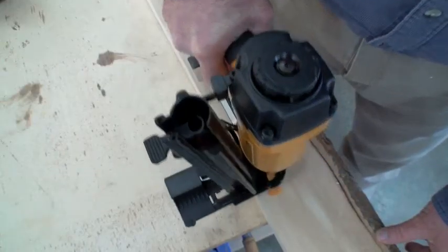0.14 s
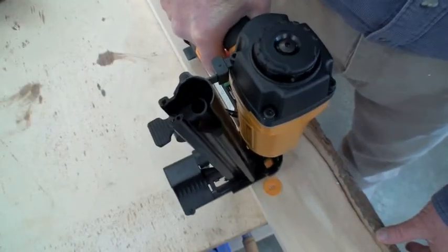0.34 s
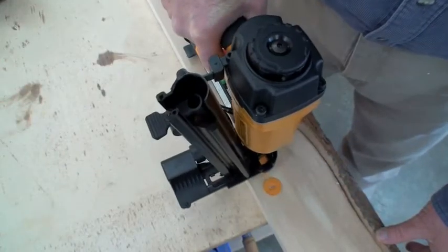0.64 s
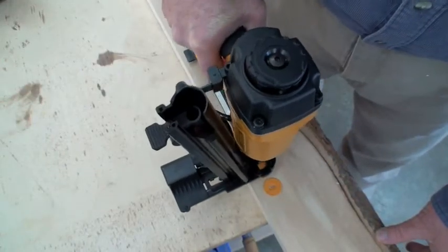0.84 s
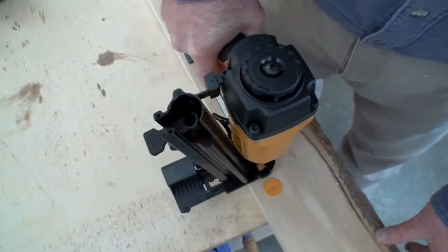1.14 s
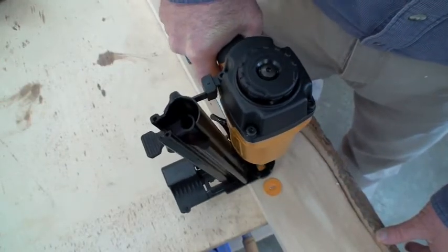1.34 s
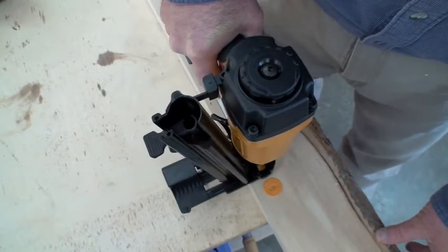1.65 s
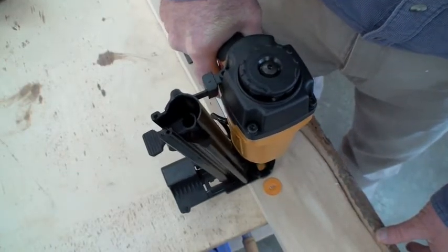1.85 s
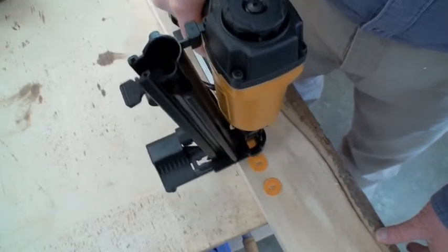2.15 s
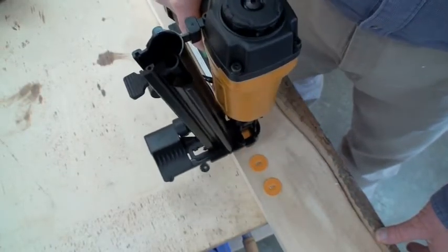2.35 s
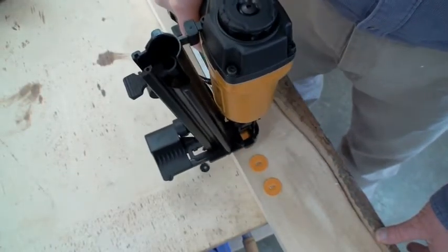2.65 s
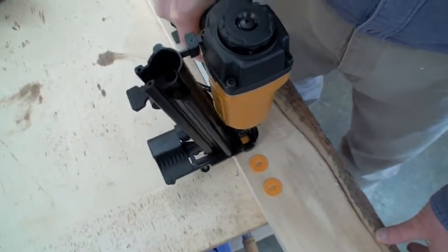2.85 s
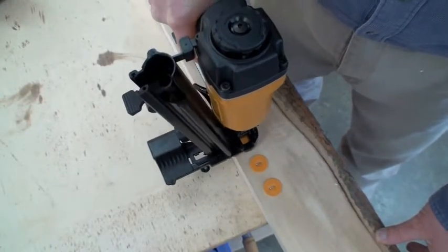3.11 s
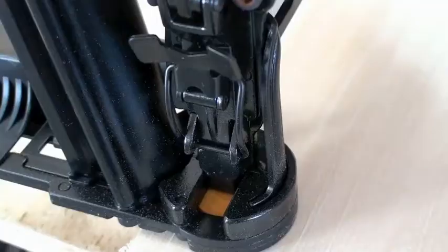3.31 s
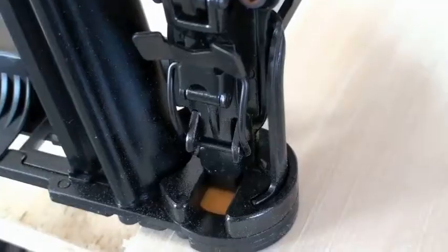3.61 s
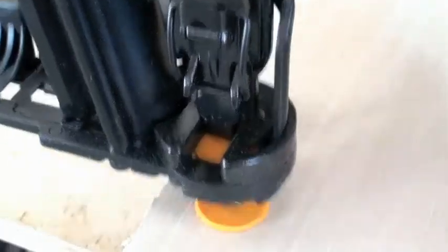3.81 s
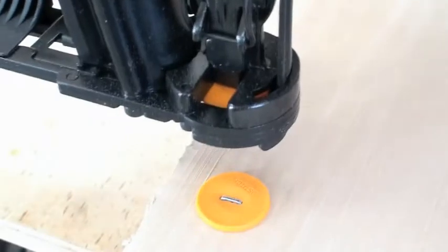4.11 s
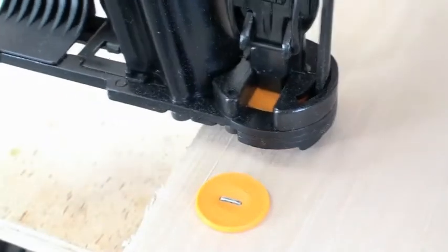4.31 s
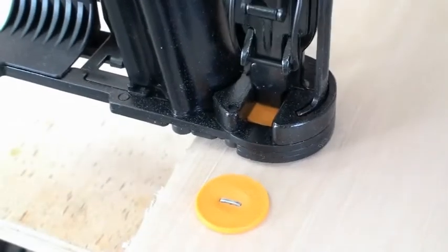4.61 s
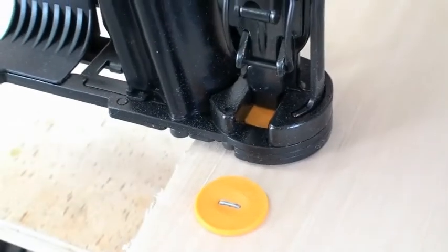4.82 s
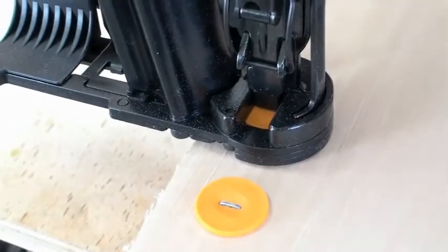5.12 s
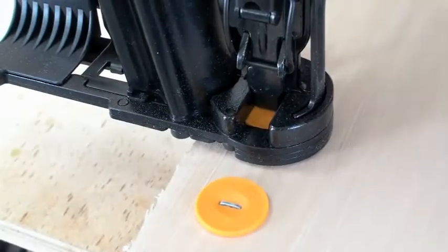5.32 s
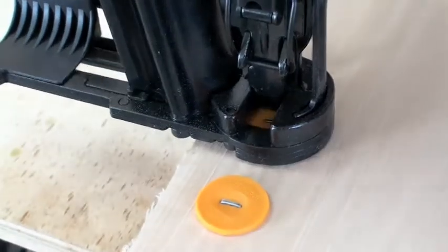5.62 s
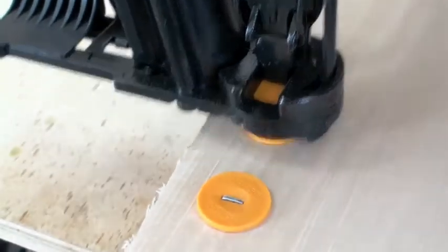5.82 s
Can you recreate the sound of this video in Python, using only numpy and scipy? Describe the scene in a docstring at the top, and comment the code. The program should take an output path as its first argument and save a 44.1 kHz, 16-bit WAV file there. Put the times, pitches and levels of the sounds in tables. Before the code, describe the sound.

The echo of a shot dies away in a workshop, with a small plastic tick, over a faint low rumble. At about 1 second a pneumatic stapler clacks and knocks down on plywood, close to the microphone, with a very faint squeak and then a softer knock. At 1.6 seconds it fires a sharp, loud shot, followed at once by a short hiss of air and a brief room echo. A light tick follows. Near 3 seconds the tool clacks and knocks on the board again. The second shot comes at 3.5 seconds with its hiss, and exhaust air buffets the microphone around 3.9 seconds. Light clicks and soft wooden knocks fall between 4.5 and 4.9 seconds. A third, slightly weaker shot fires at 5.6 seconds, followed by a short hiss and another low puff of air on the microphone.

```python
"""A shot's echo dies away in a workshop; close by, a pneumatic cap stapler is set on plywood and fired.
Each of the three shots is a spit of air, the piston's blow and recoil, then exhaust and piston return.
Between shots the safety foot clacks, the nose knocks on the board and plastic caps tick in the feed.
Twice the exhaust air buffets the microphone. A limiter flattens the shots, so the room swells behind them."""
import sys
import numpy as np
from scipy import signal
from scipy.fft import rfft, irfft, next_fast_len
from scipy.io import wavfile
from scipy.ndimage import uniform_filter1d

SR = 44100
rng = np.random.default_rng(int(sys.argv[2]) if len(sys.argv) > 2 else 0)


def to_wav(sig):
    """Store sig (one row per channel, or 1-D mono) as 16-bit WAV at the path in sys.argv[1].

    Samples outside -1..1 are clipped; the rate is SR.
    """
    pcm = np.clip(np.atleast_2d(sig), -1, 1) * 32767
    pcm = np.round(pcm).astype(np.int16)
    wavfile.write(sys.argv[1], SR, pcm.T)  # frames by channels


N = 262836
LEAD = SR // 2  # pre-roll: holds the shot whose echo opens the scene
TIME_S = np.arange(-LEAD, N) / SR
CUTOFF_HZ = 12900

# Workshop background. Each row: time in seconds, level in dB.
SHOP_LEVELS = [(0, -43), (1.5, -43.5), (2.6, -47.5), (4.3, -49), (5.3, -46.5)]
# Workshop reverberation. Each row: frequency in Hz, t60 in seconds.
ROOM_DECAY = [(60, 1), (170, 0.66), (500, 0.61), (1500, 0.71), (4000, 0.63), (7000, 0.43), (12000, 0.27)]

# Spectral shapes. Each row: frequency in Hz, relative density in dB.
SHOP_SPECTRUM = [(25, -12), (45, -8), (100, -0.5), (170, 1), (270, -2.5), (500, -9.5), (800, -12.5),
                 (1200, -17), (2700, -23.5), (6000, -26.5), (12500, -28)]  # background rumble
TICK_SPECTRUM = [(300, 13), (2000, 6), (4000, -0.5), (7000, -5), (10000, -1), (12500, -5.5)]  # caps, first touch, trigger friction
THUD_SPECTRUM = [(50, -27.5), (140, 7), (300, 3), (600, 3.5), (1400, -4), (2400, -7), (4000, -34),
                 (12000, -59.5)]  # nose on board
SPIT_SPECTRUM = [(40, 9.5), (150, -26.5), (400, 3), (1000, -22.5), (3000, -11.5), (6000, -8), (10000, -6),
                 (12500, -4.5)]  # air at firing
EXHAUST_SPECTRUM = [(40, 3), (100, 0), (400, -4), (1500, -8), (2800, -7), (4500, -3), (9000, 0), (12500, 1)]  # air at release
BOOM_SPECTRUM = [(40, -40), (100, -10.5), (160, -1), (260, -2), (430, 0.5), (620, -2), (820, 3.8),
                 (1020, 0), (1350, -1), (1950, 0), (2600, -6.5), (4000, -9), (7000, -15), (12500, -13)]  # board under a piston blow
CRACK_SPECTRUM = [(30, -8), (70, -12), (160, 5), (350, 2.5), (700, -8), (1400, -8.5), (2100, -0.5),
                  (3000, -7), (4300, -9.5), (7000, -8.5), (12500, -9.5)]  # piston impact

# Resonances. Each row: frequency in Hz, gain in dB, t60 in seconds.
PLYWOOD_MODES = [(84.2, -14, 0.077), (130, -23.5, 0.29), (163.7, -11, 0.15), (253.7, -5.5, 0.27),
                 (358, -5, 0.18), (411.3, 1, 0.19), (436.5, -0.5, 0.061), (575, -15, 0.23),
                 (808, -16.5, 0.45), (1050, -6.5, .09), (1230, -4, .08), (1550, -3, 0.13),
                 (1830, -4, 0.093), (2200, -30, 0.059)]
BODY_MODES = [(832.5, -15, 0.36), (1010, -8, .02), (1212, 0, 0.042), (1330.5, -5.5, 0.12),
              (1440, -2, 0.044), (1690, -4.5, 0.012), (1840, -6, 0.019), (2180, -25, 0.1)]  # the tool's steel
FOOT_SPRING_MODES = [(403, 0, .17), (432, -3, .12)]  # a close pair that swells together

# Exhaust air at the microphone. Each row: start and end in seconds, level in dB, eddy rate in Hz.
EXHAUST_GUSTS = [(3.805, 3.975, -7, 72), (5.893, 5.97, -5.5, 86)]
# Safety foot. Each row: start in seconds, clack in dB, spring ring in dB.
FOOT_CLACKS = [(.976, -10.5, -19), (2.92, -14, -20), (4.497, -26.5, -35), (4.674, -31, -27),
               (4.74, -28.5, -50), (4.891, -30.5, -46)]
# Plastic caps clicking in the feed. Each row: start in seconds, level in dB.
FEED_TICKS = [(0.176, -15), (2.069, -20), (2.931, -31), (4.505, -35), (4.741, -30)]
# Nose set on the board. Each row: start in seconds, level in dB, contact in seconds, touch tick in dB.
NOSE_LANDINGS = [(1.037, -6.5, .0011, -20), (1.430, -14, .0052, -46), (2.975, -5, .00085, -22),
                 (4.535, -31, .0033, -55), (4.748, -12, .0037, -45), (4.893, -18, .0036, -55)]
# Shots. Each row: firing time in seconds, strength in dB, trigger release time in seconds,
# then exhaust, piston return and trigger rub gains in dB.
STAPLE_SHOTS = [(-.25, 0, -.1, 2.5, 7, 0), (1.612, 1.5, 1.762, 3, 7, -1), (3.488, 2, 3.677, 4, 4, 5),
                (5.576, -5, 5.741, -6, -6, -10)]
# Piston blows. Each row: delay in seconds, then crack, steel body and room impulse in dB.
PISTON_DRIVE = [(.003, 5.5, 4, 38.5), (.0238, 13.5, 11, 26)]  # drive and recoil, timed from firing
PISTON_RETURN = [(-.019, -7, -8, 13), (.03, 2, 7, 17)]  # unseating and landing, timed from release


def from_db(db):
    """Decibels to gain."""
    return 10 ** (np.asarray(db) / 20)


def unit_rms(x):
    """Scale to rms 1."""
    return x / np.sqrt(np.mean(x ** 2) + 1e-20)


def at_hz(points, hz):
    """Read a table along a log-frequency axis."""
    points_hz, values = np.transpose(points)
    return np.interp(np.log(np.maximum(hz, 1)), np.log(points_hz), values)


def coloured(x, spectrum):
    """Shape the spectrum, with soft outer edges; a white input keeps its power."""
    size = next_fast_len(len(x))
    hz = np.fft.rfftfreq(size, 1 / SR)
    edges = hz / (hz + 10) / (1 + (hz / (CUTOFF_HZ + 800)) ** 40)
    response = unit_rms(from_db(at_hz(spectrum, hz)) * edges)
    return irfft(rfft(x, size) * response, size)[:len(x)]


def noise(spectrum):
    """Steady coloured noise, rms 1."""
    return coloured(rng.standard_normal(len(TIME_S)), spectrum)


def drift(rate_hz):
    """Random wander below rate_hz, rms 1."""
    low_pass = signal.butter(2, rate_hz, fs=SR, output="sos")
    return unit_rms(signal.sosfilt(low_pass, rng.standard_normal(len(TIME_S))))


def burst(start_s, db, decay_s, rise_s=.00085):
    """Envelope: fast rise, exponential decay."""
    envelope = np.zeros(len(TIME_S))
    span = slice(*np.searchsorted(TIME_S, [start_s, start_s + 20 * decay_s]))
    age_s = TIME_S[span] - start_s
    envelope[span] = from_db(db) * (1 - np.exp(-age_s / rise_s)) * np.exp(-age_s / decay_s)
    return envelope


def arch(start_s, end_s):
    """Half-sine envelope."""
    return np.sin(np.pi * np.clip((TIME_S - start_s) / (end_s - start_s), 0, 1))


def click(at_s, db):
    """One impulse."""
    impulse = np.zeros(len(TIME_S))
    impulse[LEAD + round(at_s * SR)] = from_db(db)
    return impulse


def push(at_s, db, contact_s):
    """Smooth force pulse: longer contact reaches fewer high modes."""
    pulse = np.sin(np.pi * np.clip((TIME_S - at_s) / contact_s + .5, 0, 1)) ** 2
    return from_db(db) * pulse / np.sum(pulse)


def soften(x, cut_hz):
    """One-pole low-pass."""
    pole = np.exp(-2 * np.pi * cut_hz / SR)
    return signal.lfilter([1 - pole], [1, -pole], x + 1e-18)


def ring(x, modes):
    """Decaying sines driven by x, in alternating signs."""
    total = 0
    for k, (hz, db, t60_s) in enumerate(modes):
        radius, angle = 1e-3 ** (1 / (t60_s * SR)), 2 * np.pi * hz / SR
        feedback = [1, -2 * radius * np.cos(angle), radius * radius]
        mode = signal.lfilter([0, np.sin(angle)], feedback, x + 1e-18)
        total = total + (-1) ** k * from_db(db) * mode
    return total


def shop_rumble():
    """Low background noise, slowly changing in level."""
    return from_db(np.interp(TIME_S, *np.transpose(SHOP_LEVELS))) * noise(SHOP_SPECTRUM)


def shop_reverb(sent, gap_s=.021, build_up_s=.005):
    """Dense echoes that arrive after a short gap and die sooner in the treble."""
    age_s = np.arange(3 * SR // 2) / SR
    white = rfft(rng.standard_normal(len(age_s)))
    hz = np.fft.rfftfreq(len(age_s), 1 / SR)
    edges_hz = np.r_[0, np.geomspace(90, SR / 2, 17)]
    tail = 0
    for low, high in zip(edges_hz, edges_hz[1:]):
        band = irfft(white * (hz >= low) * (hz < high), len(age_s))
        tail = tail + band * 1e-3 ** (age_s / at_hz(ROOM_DECAY, (low + high) / 2))
    tail *= 1 - np.exp(-np.maximum(age_s - gap_s, 0) / build_up_s)
    return signal.fftconvolve(sent, tail / np.sqrt(np.sum(tail ** 2)))[:len(sent)]


def nose_squeak(start_s=1.11, end_s=1.18, pitch_hz=5350, bend_hz=350, waver_hz=240, level_db=-41.5):
    """The nose slides on the wood and squeaks faintly."""
    slide = arch(start_s, end_s)
    hz = pitch_hz + bend_hz * slide + waver_hz * drift(490)
    return from_db(level_db) * np.sqrt(np.abs(slide)) * np.sin(2 * np.pi * np.cumsum(hz) / SR)


def trigger_rub(lead_s=.023, level_db=-30, decay_s=.04, hiss_db=-13):
    """The trigger slides home just before each shot; friction excites the steel body."""
    friction = noise(TICK_SPECTRUM)
    stroke = sum(burst(s - lead_s, level_db + db, decay_s, rise_s=.006) for s, *_, db in STAPLE_SHOTS)
    return stroke * (unit_rms(ring(friction, BODY_MODES)) + from_db(hiss_db) * friction)


def gusts(churn_gain=.6, churn_high_hz=170, churn_low_hz=55, wander=.2, lump_db=1.5, steepness=.42):
    """Lopsided eddies of exhaust air roll over the microphone at an uneven rate."""
    wind = 0
    for start_s, end_s, db, eddy_hz in EXHAUST_GUSTS:
        phase = 2 * np.pi * np.cumsum(eddy_hz * (1 + wander * drift(54))) / SR
        lumps = from_db(lump_db * drift(6.8))
        eddies = np.sqrt(2) * (np.cos(phase) + steepness * np.cos(2 * phase)) * lumps
        swirl = drift(churn_high_hz)
        churn = churn_gain * (swirl - soften(swirl, churn_low_hz))
        wind = wind + from_db(db) * arch(start_s, end_s) * (eddies + churn)
    return wind


def foot_and_caps(rebound_s=.014, rebound_db=-7, steel_db=-5, shake_db=-11.5,
                  foot_room_db=-6, shake_room_db=-5, tick_room_db=21):
    """The foot clacks, rebounds, rings its spring and shakes the caps; caps and nose tick."""
    strikes = sum(click(s, db) + click(s + rebound_s, db + rebound_db) for s, db, _ in FOOT_CLACKS)
    spring = ring(sum(click(s, db) for s, _, db in FOOT_CLACKS), FOOT_SPRING_MODES)
    foot = from_db(steel_db) * ring(strikes, BODY_MODES) + spring
    grain = noise(TICK_SPECTRUM)
    shake = grain * sum(burst(s, db + shake_db, decay_s=.018, rise_s=.006) for s, db, _ in FOOT_CLACKS)
    ticks = FEED_TICKS + [(s, db) for s, _, _, db in NOSE_LANDINGS]
    tick = grain * sum(burst(s, db, decay_s=.0076) for s, db in ticks)
    snap = coloured(sum(click(s, db + tick_room_db) for s, db in ticks), TICK_SPECTRUM)
    sent = from_db(foot_room_db) * foot + from_db(shake_room_db) * shake + snap
    return foot + shake + tick, sent


def nose_knocks(seat_s=.0128, seat_db=-3.5, bounce_s=.062, bounce_db=-12, contact_growth=1.1,
                hardness=1.5, rattle_db=-9, board_room_db=-10.5, thud_room_db=15.5):
    """The nose lands, seats and bounces: the board rings, the tool rattles, a thud fills the room."""
    grain = noise(THUD_SPECTRUM)
    force, rattle, thud = 0, 0, 0
    for s, db, contact_s, _ in NOSE_LANDINGS:
        hits = [(s, db), (s + seat_s, db + seat_db), (s + bounce_s, db + bounce_db)]
        cut_hz = hardness / contact_s
        force = force + sum(push(*hit, contact_s * contact_growth ** k) for k, hit in enumerate(hits))
        shaking = grain * sum(burst(*hit, decay_s=.025) for hit in hits)
        impulses = sum(click(*hit) for hit in hits)
        rattle = rattle + soften(soften(shaking, cut_hz), cut_hz)
        thud = thud + soften(soften(impulses, cut_hz), cut_hz)
    board = ring(force, PLYWOOD_MODES)
    sent = from_db(board_room_db) * board + from_db(thud_room_db) * coloured(thud, THUD_SPECTRUM)
    return board + from_db(rattle_db) * rattle, sent


def air_jets(spit_db=2.5, exhaust_db=6.5, flutter_db=2, spit_room_db=-2, exhaust_room_db=-4, puff_hz=220):
    """Turbulent jets fade as pressure drops: a spit at firing, the exhaust at release."""
    flutter = from_db(flutter_db * drift(250))
    spit, exhaust = 0, 0
    for fire_s, strength_db, release_s, vent_db, *_ in STAPLE_SHOTS:
        spit = spit + burst(fire_s, spit_db + strength_db, decay_s=.048, rise_s=.0071)
        exhaust = exhaust + burst(release_s, exhaust_db + vent_db, decay_s=.022, rise_s=.00034)
    spit *= noise(SPIT_SPECTRUM) * flutter
    exhaust *= noise(EXHAUST_SPECTRUM) * flutter
    sent = from_db(spit_room_db) * spit + from_db(exhaust_room_db) * exhaust
    return spit + exhaust, sent - soften(sent, puff_hz)  # the low puff does not carry


def piston(crack_decay_s=.0043, body_decay_s=.004, body_room_db=-9):
    """Each blow cracks and shakes the steel body; the whole board booms into the room."""
    blows = []
    for fire_s, strength_db, release_s, _, return_db, _ in STAPLE_SHOTS:
        strokes = [(fire_s, strength_db, PISTON_DRIVE), (release_s, return_db, PISTON_RETURN)]
        for s, db, stroke in strokes:
            blows += [np.add(blow, (s, db, db, db)) for blow in stroke]
    crack = noise(CRACK_SPECTRUM) * sum(burst(s, db, crack_decay_s) for s, db, _, _ in blows)
    chatter = unit_rms(ring(noise(CRACK_SPECTRUM), BODY_MODES))
    body = chatter * sum(burst(s, db, body_decay_s) for s, _, db, _ in blows)
    boom = coloured(sum(click(s, db) for s, _, _, db in blows), BOOM_SPECTRUM)
    return crack + body, boom + from_db(body_room_db) * body


def scene(dip_start_s=3.35, dip_end_s=3.435, dip_db=-17):
    """Tool, room and background at one microphone; the whole level dips once, briefly."""
    # each returns (close sound, sound sent into the room)
    close, sent = np.sum([piston(), air_jets(), nose_knocks(), foot_and_caps()], axis=0)
    mono = shop_rumble() + shop_reverb(sent) + trigger_rub() + nose_squeak() + gusts() + close
    mono *= from_db(dip_db * arch(dip_start_s, dip_end_s) ** 2)
    return np.tile(mono[LEAD:], (2, 1))


def record(dry, limit_db=-10, release_db_per_s=90, attack_hz=175, sense_hz=6500, ceiling=1.12):
    """A limiter, less alert to treble, ducks fast and recovers slowly; then soft clip and low-pass."""
    power = uniform_filter1d(soften(dry[0], sense_hz) ** 2, size=128)
    excess_db = np.maximum(10 * np.log10(np.maximum(power, 1e-12)) - limit_db, 0)
    recovery_db = release_db_per_s * np.arange(N) / SR
    held_db = np.maximum.accumulate(excess_db + recovery_db) - recovery_db
    limited = dry * from_db(-held_db[0] - soften(held_db - held_db[0], attack_hz))
    low_pass = signal.ellip(10, .3, 70, CUTOFF_HZ, fs=SR, output="sos")
    return signal.sosfilt(low_pass, ceiling * np.tanh(limited / ceiling))


dry = scene()
out = record(dry)
to_wav(out)
```